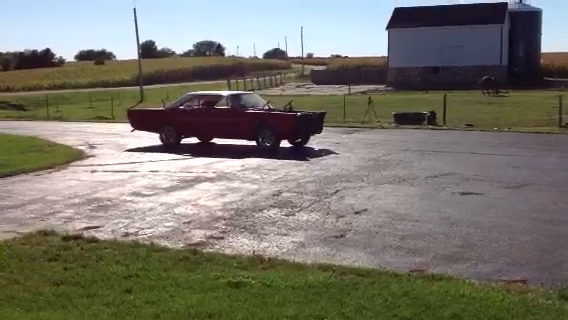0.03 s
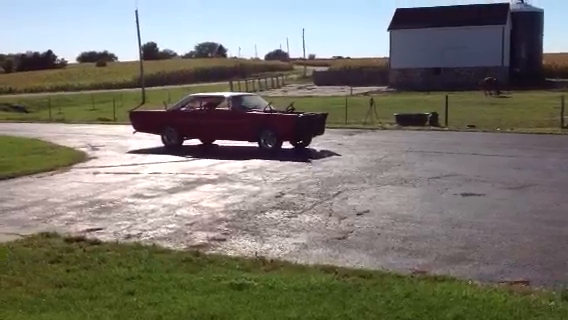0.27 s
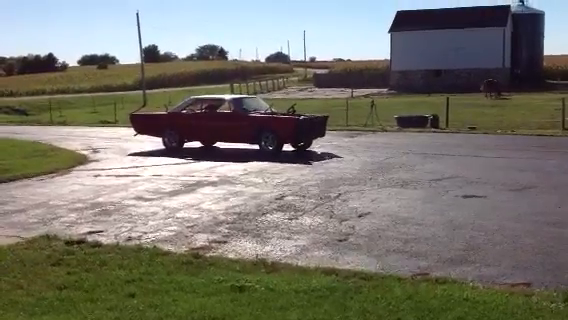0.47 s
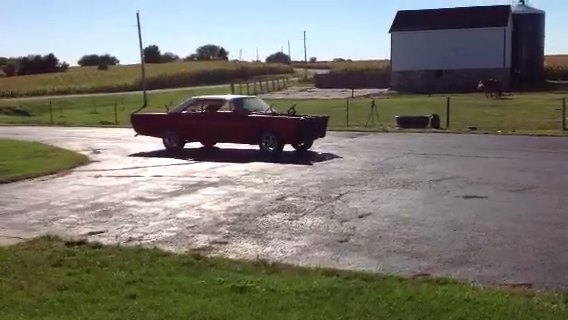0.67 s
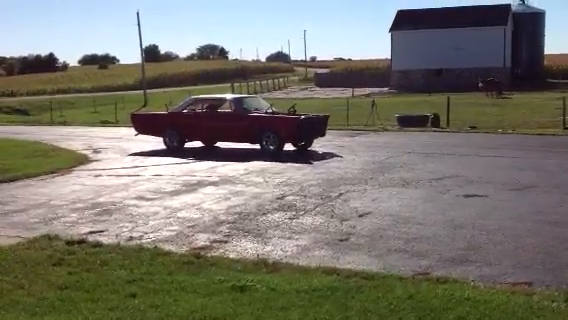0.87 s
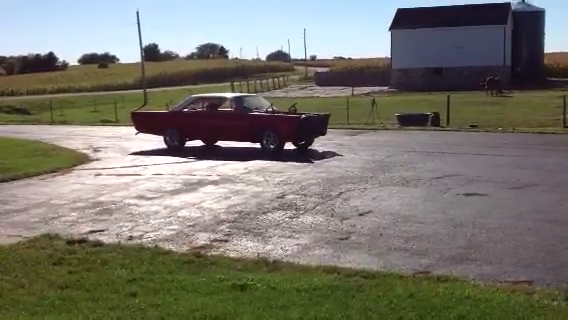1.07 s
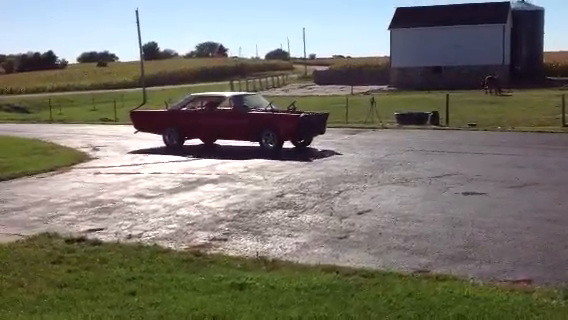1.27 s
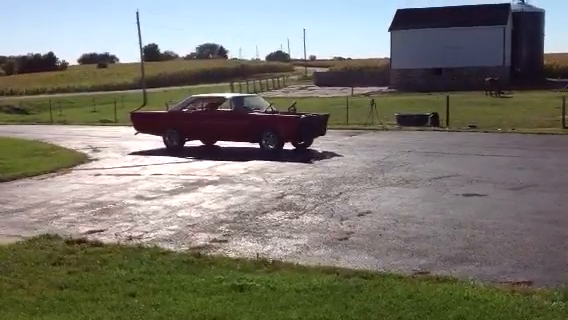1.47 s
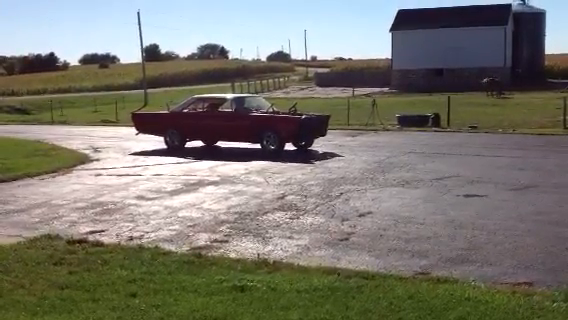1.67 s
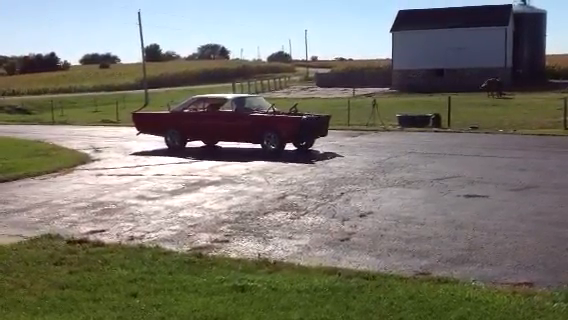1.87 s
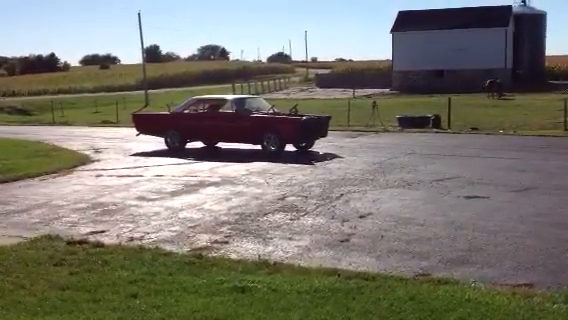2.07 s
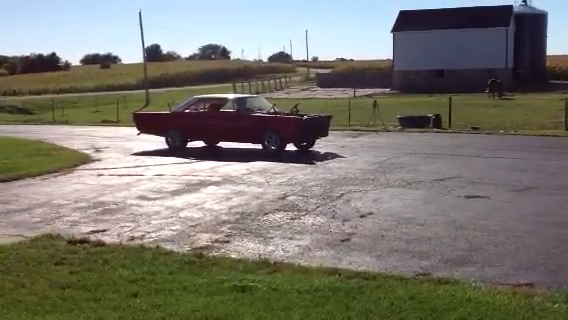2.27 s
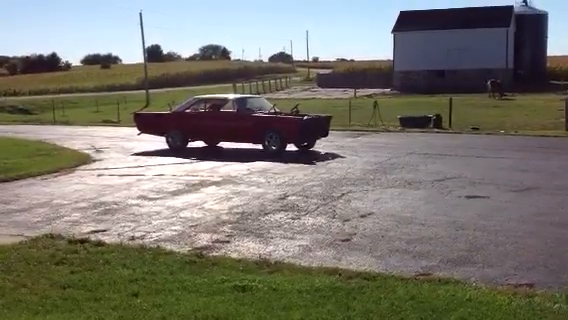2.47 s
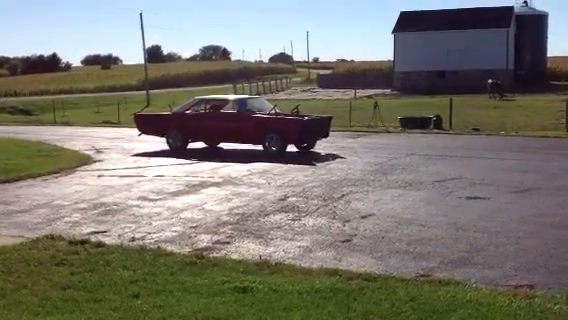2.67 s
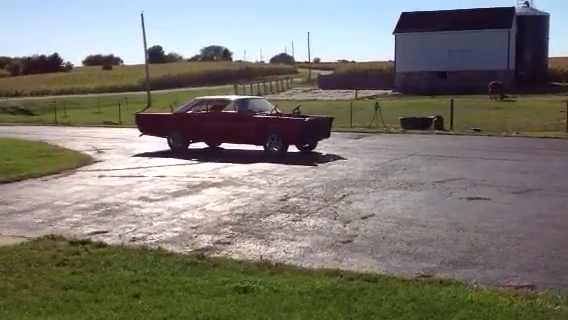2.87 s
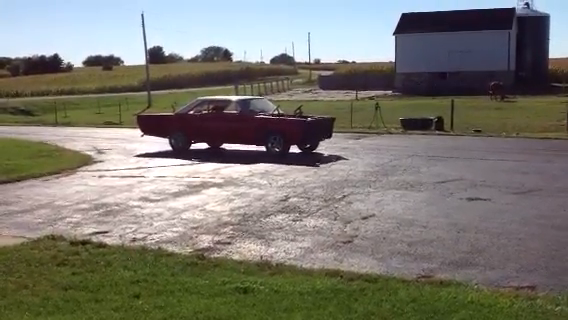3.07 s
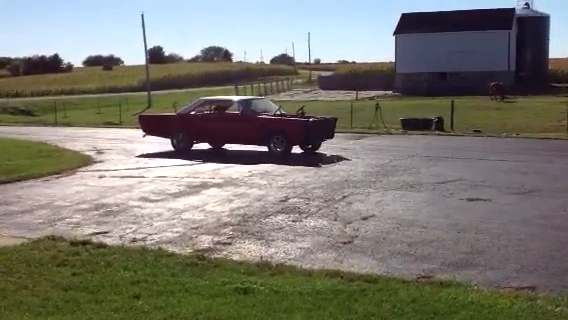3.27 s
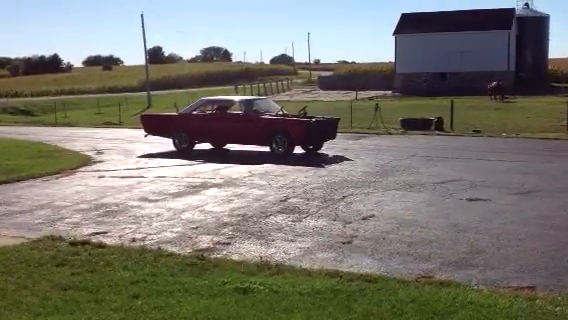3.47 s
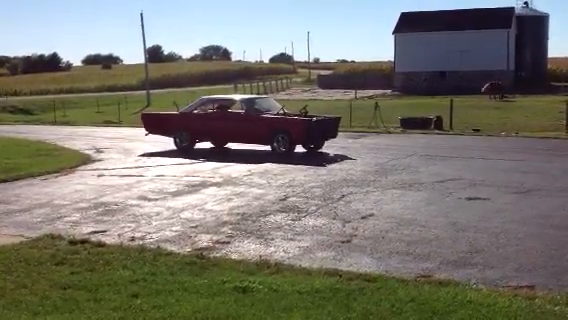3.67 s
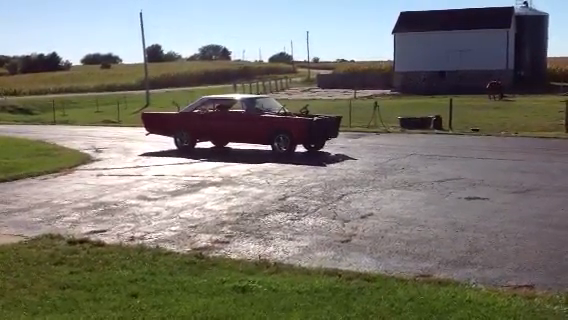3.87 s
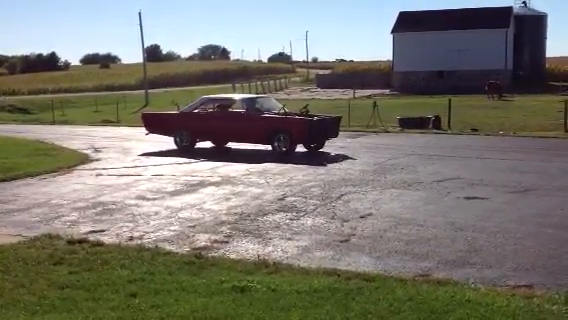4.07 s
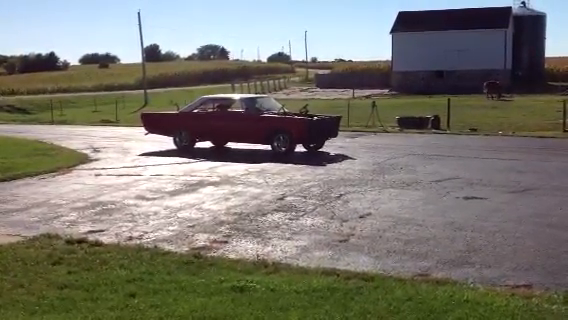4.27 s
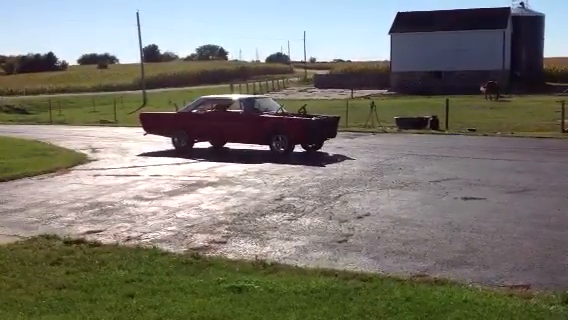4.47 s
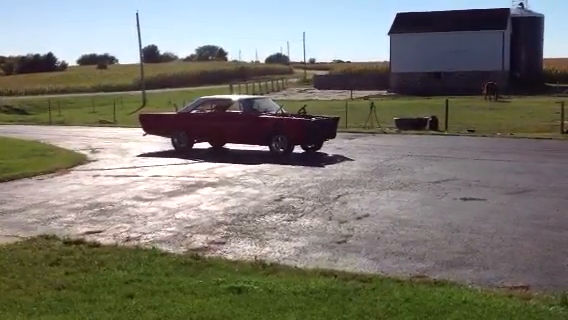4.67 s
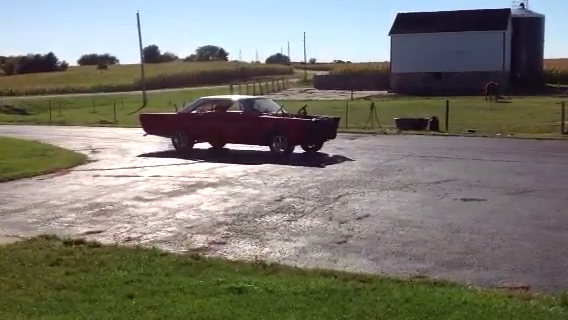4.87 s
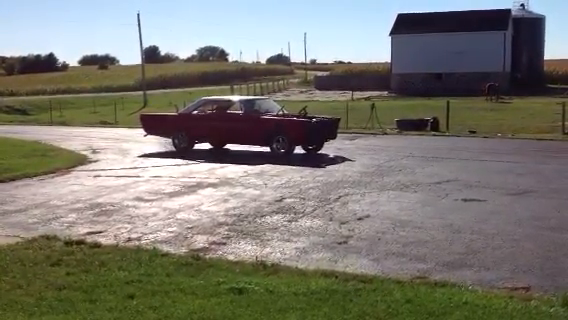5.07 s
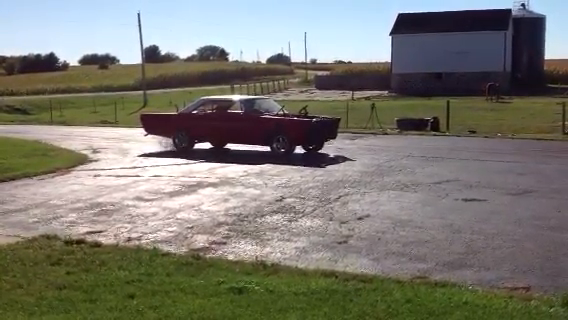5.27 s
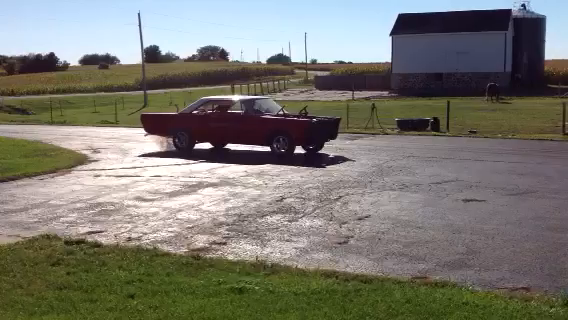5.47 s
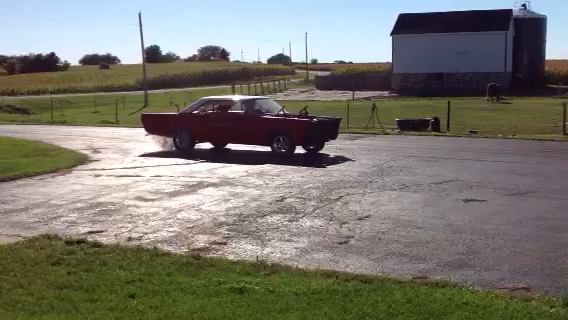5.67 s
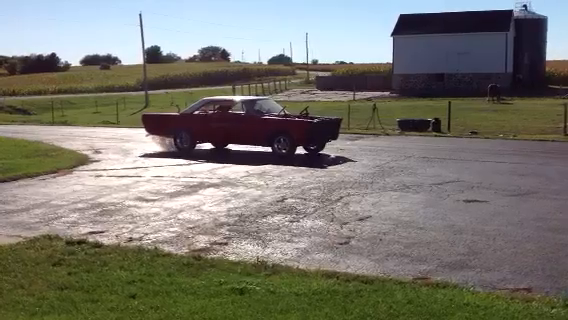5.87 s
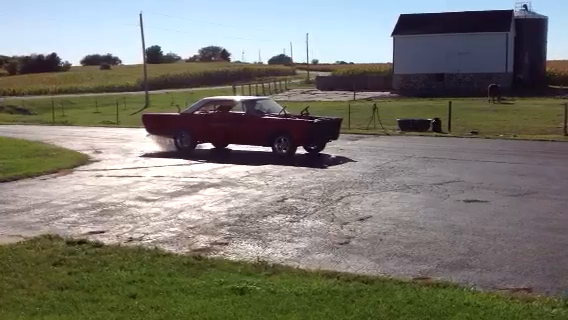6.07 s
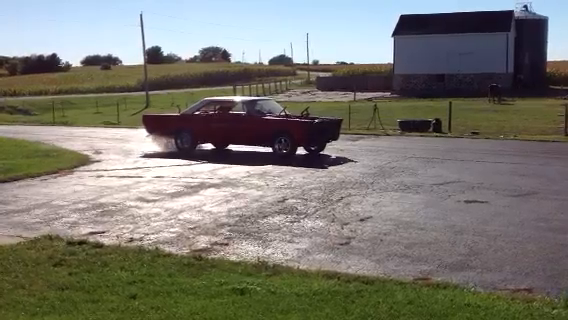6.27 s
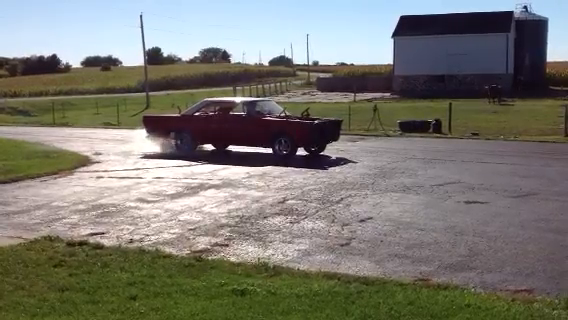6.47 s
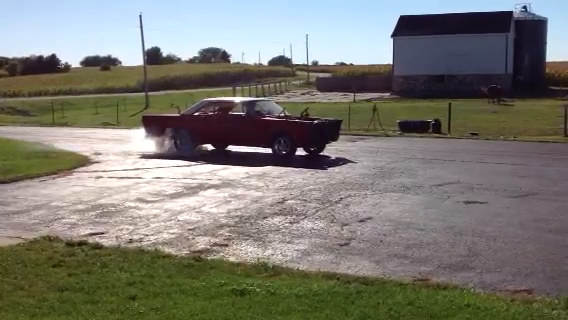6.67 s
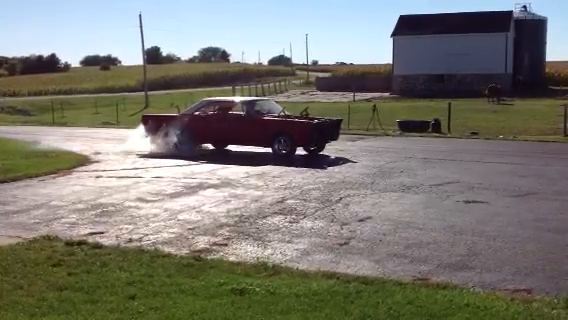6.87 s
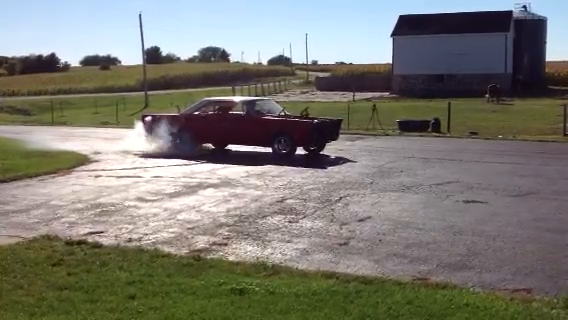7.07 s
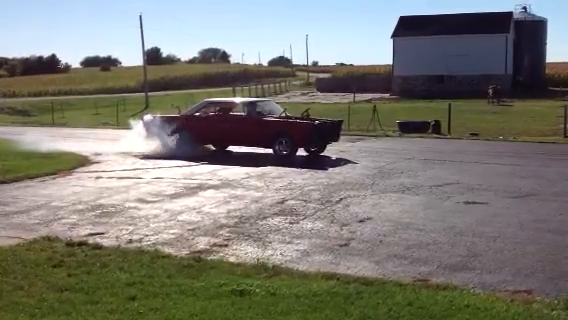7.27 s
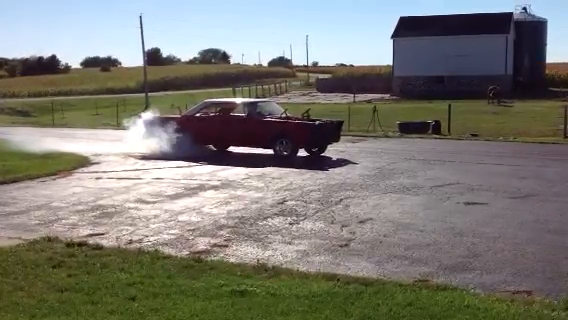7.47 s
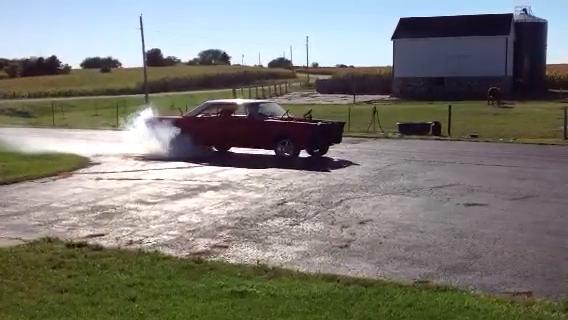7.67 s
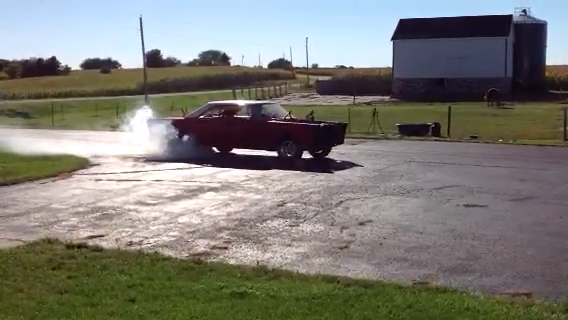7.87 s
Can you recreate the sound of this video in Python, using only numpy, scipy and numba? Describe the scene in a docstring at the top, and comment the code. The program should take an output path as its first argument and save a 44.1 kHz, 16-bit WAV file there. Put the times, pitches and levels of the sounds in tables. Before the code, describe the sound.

Open-air mono phone pickup with faint outdoor hiss and slight yard echoes. A distant lumpy V8 chugs with thin panel hum, dips low, then blips and climbs into barking, crackling exhaust. Just before four seconds the rear tyres chirp and shriek in rapid broken pieces; after five the squeal gives way to a noisy scrubbing howl rising with the engine.

```python
"""A cross-plane V8 idles on a farm driveway; its revs sag, a dry tick snaps, then it is revved on the brakes.
Uneven pulse trains ring pipe modes: one bank barks and cracks near by, the other thuds from the far side.
The rear tyres squeal in short grabs (wavering sines), whistle and scrub (filtered noise),
then smear into a rising howl of narrow-band noise. A phone listens from the grass."""
import sys
import numpy as np
from scipy import signal
from scipy.io import wavfile
from scipy.ndimage import uniform_filter1d
from numba import njit

SR = 44100
rng = np.random.default_rng(int(sys.argv[2]) if len(sys.argv) > 2 else 0)


def put_to_file(sound):
    """Save the sound as 16-bit audio at rate SR, in the file named by the first command-line argument."""
    columns = np.atleast_2d(sound).T  # one column per channel
    safe = np.clip(columns, -1, 1)
    whole_steps = np.round(safe * 32767)
    wavfile.write(sys.argv[1], SR, whole_steps.astype(np.int16))


N = 349713
T = np.arange(N) / SR


def undb(db):
    """Decibels to amplitude."""
    return 10 ** (np.asarray(db) / 20)


def level(x, db=0):
    """Scales to an rms level."""
    return x * undb(db) / np.sqrt(np.mean(x ** 2))


def even(x):
    """Holds the running rms near 1 over a third of a second."""
    return x / np.sqrt(uniform_filter1d(x ** 2, SR // 3))


def curves(table):
    """Columns of a table as sample-rate curves."""
    s, *columns = np.transpose(table)
    return [np.interp(T, s, c) for c in columns]


def shape(start, attack, hold, release):
    """Squared-ramp attack, hold, release in seconds; gain 0 to 1."""
    return np.interp(T, np.cumsum([start, attack, hold, release]), [0, 1, 1, 0]) ** 2


def noise():
    """White noise, rms 1."""
    return rng.standard_normal(N)


def walk(rate_hz):
    """Random levels joined by straight slews of 1 / rate_hz s; spread about 0.7."""
    k = int(SR / rate_hz)
    return 0.888 * uniform_filter1d(np.repeat(rng.standard_normal(N // k + 1), k), k)[:N]


def fade(x, ms):
    """Gives every pulse an exponential tail."""
    return signal.lfilter([1], [1, -np.exp(-1000 / (ms * SR))], x)


def train(at, size):
    """Single-sample pulses of the given sizes."""
    pulses = np.zeros(N)
    pulses[at] = size
    return pulses


def ring(x, modes, flip=-1):
    """Parallel resonances; alternate signs keep the valleys shallow, equal signs (flip=1) give a sharp front."""
    total = 0
    for k, (hz, width_hz, db) in enumerate(modes):
        b, a = signal.iirpeak(hz, hz / width_hz, SR)
        total = total + flip ** k * undb(db) * signal.lfilter(b, a, x)
    return total


@njit
def svf(x, hz, width_hz):
    """State-variable band-pass with a moving centre, gain 1 there."""
    y, b, l = np.empty(len(x)), 0., 0.
    for i in range(len(x)):
        g, k = np.tan(np.pi * hz[i] / SR), width_hz / hz[i]
        v = (b + g * (x[i] - l)) / (1 + g * (g + k))
        b, l, y[i] = 2 * v - b, l + 2 * g * v, k * v
    return y


# open-air noise bands: (centre [Hz], width [Hz], gain [dB])
AIR_BANDS = [(45, 40, -24), (181, 143, 29.5), (930, 1900, 15.5), (4230, 9200, 4.5), (11500, 6700, -2)]


def air():
    """Steady background: white noise through broad resonances."""
    return level(ring(noise(), AIR_BANDS), -44.0)


def yard(car):
    """The barn and the yard send back two delayed, low-passed echoes."""
    dull = signal.lfilter([.3], [1, -.7], car)
    return sum(undb(db) * np.interp(T - s, T, dull, left=0) for s, db in ((.047, -21), (.093, -14)))


# a dry tick close by and its rebound: (time [s], level [dB])
TICK_HITS = [(1.169, -13), (1.173, -28)]


def ticks():
    """Bright snaps: noise under a 1 ms decay with a faint 8 ms tail."""
    hits = np.zeros(N)
    for s, db in TICK_HITS:
        hits[int(s * SR)] = undb(db)
    burst = (fade(hits, 0.98) + 0.12 * fade(hits, 7.9)) * noise()
    return ring(burst, [(6200, 13000, -8.0), (12000, 7000, 3.0)])


# panels humming at low revs: (pitch [Hz], rms level [dB], start [s], attack [s], hold [s], release [s])
PANEL_DRONES = [(276.4, -45.5, -0.38, .1, 0.9, 0.2), (189, -44, 0.775, 0.087, 0.26, .05),
                (188.5, -45.5, 1.37, 0.31, 0.21, .15)]


def drones():
    """Panels drone as thin sines, slightly wavering in pitch and level."""
    total = 0
    for hz, db, *when in PANEL_DRONES:
        size = np.sqrt(2) * undb(db + 2 * walk(9.7)) * shape(*when)
        phase = 2 * np.pi * np.cumsum(hz * (1 + 0.0092 * walk(11.7))) / SR
        total = total + size * np.sin(phase)
    return total


# pitch at which the tread sings, first squeal, then howl: (time [s], pitch [Hz])
TREAD_PITCH = [(3.1, 1262), (3.4, 1248), (3.83, 1156), (3.88, 1070), (3.94, 1004), (4.09, 1040),
               (4.23, 998.6), (5.18, 980), (5.3, 1003), (6.0, 1012), (6.25, 1072), (6.45, 1190),
               (6.62, 1198), (6.9, 1354), (7.15, 1407), (7.4, 1470), (7.93, 1560)]


def tread_hz():
    """Stick-slip pitch shared by squeal and howl."""
    return curves(TREAD_PITCH)[0]


def slip_band(hz, width_hz, octave_gain):
    """Narrow noise band with a faint octave; self-excited, so its size is steadier than noise."""
    band = svf(svf(noise(), hz, width_hz), hz, 3 * width_hz)
    envelope = np.abs(signal.hilbert(band)).clip(.02 * band.std())
    band = level(band / envelope ** .6)
    return band + octave_gain * level(svf(noise(), 2 * hz, 2 * width_hz))


# envelopes: start, attack, hold, release [s]
WHISTLE_S, WHISTLE_DB = (3.86, 0.061, 0.99, 0.17), -24.5
WHISTLE_PEAK_S, WHISTLE_PEAK_DB = (3.99, 0.041, 0.1, 0.035), -21  # brief swell
WHISTLE_FROM_HZ, WHISTLE_TO_HZ, WHISTLE_SETTLES_S = 2130., 1487, 0.57


def whistle():
    """Narrow noise band whose pitch falls exponentially; returns pitch and sound."""
    settle = np.exp(-(T - WHISTLE_S[0]).clip(0) / WHISTLE_SETTLES_S)
    hz = WHISTLE_TO_HZ + (WHISTLE_FROM_HZ - WHISTLE_TO_HZ) * settle
    size = undb(WHISTLE_DB + 0.93 * walk(14)) * shape(*WHISTLE_S)
    size = size + undb(WHISTLE_PEAK_DB) * shape(*WHISTLE_PEAK_S)
    return hz, size * slip_band(hz, 45., .05)


HOWL_S, HOWL_DB = (5.1, .2, 2.05, .12), -24  # faint at first
HOWL_LOUD_S, HOWL_LOUD_DB = (6.05, .25, 1.08, .09), -23  # added as the wheels gather speed


def howl():
    """Wider noise band on the tread's rising pitch."""
    size = undb(HOWL_DB) * shape(*HOWL_S) + undb(HOWL_LOUD_DB) * shape(*HOWL_LOUD_S)
    return size * slip_band(tread_hz(), 60., .2)


SUM_TONE_GAIN_DB = 14


def sum_tone(sing, whistle_hz, whistling):
    """Squeal and whistle multiply in the same rubber; the sum frequency is kept."""
    product = sing * even(whistling + 1e-6 * noise()) * whistling.std()
    tone = svf(product, whistle_hz + tread_hz(), 250.)
    return undb(SUM_TONE_GAIN_DB) * tone * shape(*WHISTLE_S)


# tyre-on-asphalt resonances: (centre [Hz], width [Hz], gain [dB])
SCRUB_MODES = [(765, 610, -0.5), (727, 70, -1), (1038, 470, -1.5), (1364, 870, 4.3), (1942, 360, 2),
               (2520, 720, -1), (4440, 7600, -12), (9260, 2800, -18)]
SCRUB_S, SCRUB_DB = (3.8, 0.13, 5., .1), -15.76  # level once grown
SCRUB_GROWS_DB, SCRUB_GROWS_S = 5.5, 1.74


def scrub():
    """Broad slip noise: flickering grit through the scrub resonances, once and twice."""
    grit = noise() * undb(2.2 * walk(70) + .6 * walk(9))
    once = ring(grit, SCRUB_MODES)
    twice = ring(once, SCRUB_MODES, flip=0.89)
    missing_db = SCRUB_GROWS_DB * (1 - (T - SCRUB_S[0]) / SCRUB_GROWS_S).clip(0, 1)
    return level(twice + 0.89 * once) * undb(SCRUB_DB - missing_db) * shape(*SCRUB_S)


# tread grips and sings: (start [s], level [dB], length [ms])
TREAD_GRABS = [(3.112, -26, 120), (3.268, -31, 31), (3.842, -15.5, 45), (3.893, -19.5, 36), (3.93, -10, 70),
               (3.954, -11.5, 54), (4.012, -20, 47), (4.056, -10.5, 42), (4.136, -9.5, 49), (4.192, -6, 84),
               (4.277, -6, 175), (4.452, -8, 33), (4.495, -6, 20), (4.525, -5.5, 18), (4.551, -6.5, 124),
               (4.689, -6, 55), (4.754, -9, 56), (4.841, -5, 38), (4.914, -4, 59), (4.989, -6.5, 76),
               (5.09, -6, 23), (5.122, -7.5, 38), (5.274, -13.5, 31), (5.392, -14, 35), (5.465, -11.5, 39)]
# overtones of the squeal: (multiple, level at full size [dB])
SQUEAL_OVERTONES = [(2, -11.5), (3, -27)]
GRAB_EDGE_S = .0082  # rise and fall
SINGS_S, SINGS_DB = (3.9, 0.092, 1.27, 0.095), -30  # tread keeps singing between grabs
OVERTONES_S = (2.97, 0.054, 1.73, 0.72)  # overtones thin out as the squeal tires
THIN_S, THIN_SHARE = (3.7, .03, .4, 0.1), 0.8  # overtones held back as the squeal sets in
RASP_HZ, RASP_WIDTH_HZ, RASP_DB = 2690, 400, -32.5  # rough edge


def squeal():
    """Stick-slip of the tread: a wavering tone with smeared overtones and a rough halo."""
    hz = tread_hz() * (1 + 0.01178 * walk(90) + .008 * walk(25))
    phase = 2 * np.pi * np.cumsum(hz) / SR
    size = 1e-6 + undb(SINGS_DB) * shape(*SINGS_S)
    for s, db, ms in TREAD_GRABS:
        hold_s = max(ms / 1000 - GRAB_EDGE_S, 0)
        size = size + undb(db) * shape(s - GRAB_EDGE_S / 2, GRAB_EDGE_S, hold_s, GRAB_EDGE_S)
    size = size * undb(2.0 * walk(120) + 1.0 * walk(35))
    tone = np.sin(phase) * (1 + 0.028 * walk(320))
    body = size ** 0.076 * (1 - THIN_SHARE * shape(*THIN_S)) * shape(*OVERTONES_S)
    for multiple, db in SQUEAL_OVERTONES:
        overtone = np.sin(multiple * (phase + .3 * walk(160)))
        tone = tone + body * undb(db + 4 * walk(25) + 2 * walk(80)) * overtone
    rasp = level(ring(noise(), [(RASP_HZ, RASP_WIDTH_HZ, 0)]), RASP_DB) * undb(2.6 * walk(40))
    return size * tone + size ** 0.51 * (size > 1e-4) * rasp


def tyres():
    """Squeal, whistle, howl, their sum tone and scrubbing of the slipping rubber."""
    sing = squeal()
    whistle_hz, whistling = whistle()
    return sing + whistling + howl() + sum_tone(sing, whistle_hz, whistling) + scrub()


# crank speed: (time [s], speed [rpm])
CRANK_SPEED = [(0.0, 903), (0.85, 898), (1.1, 709), (1.35, 650), (2.05, 755), (2.25, 988), (2.65, 866),
               (2.95, 1205), (3.2, 1261), (3.6, 1212), (3.9, 1415), (4.62, 1772), (5.3, 1912), (5.6, 1912),
               (6.27, 2059), (7.27, 2466), (7.6, 2751), (7.93, 3119)]


def crank():
    """Crank speed in rpm, and the push (0.3 up) that grows with it."""
    rpm = curves(CRANK_SPEED)[0]
    return rpm, ((rpm - 450) / 1200).clip(.3, 1)


# cylinders in firing order: (pipe lag [ms], thud at low, middle, high revs [dB x3], bark [dB],
# bark change per doubling of high revs [dB], crack [dB], crack change per doubling [dB])
FIRING_ORDER = [(0, 0, 0, -5, 0, -3, -7, -2), (3.55, 0, -21, 2, -8, -3, -22, 0),
                (-.73, -2, 1, -4, -6, 5, -1, 0), (-.7, -7, -9, -10, -10, -3, 0, -11),
                (5.3, -7, -15, -1, -13, 4, -22, 0), (-1.2, 2, -8, 2, -10, 13, -1, 3),
                (3.4, -3, -18, -24, -13, 4, -22, 0), (-1.14, -4, -7, -30, -11, 4, -22, 0)]
FIRST_FIRING = .55  # place in the cycle, eighths


def firings(rpm):
    """Eight firings every two turns, each with its own pipe lag, jitter and strengths."""
    eighths = np.cumsum(rpm / 60 * 4 / SR) - FIRST_FIRING + 1
    fired = np.flatnonzero(np.diff(np.floor(eighths)))
    lag_ms, *strengths = np.array(FIRING_ORDER)[np.arange(len(fired)) % 8].T
    chance = rng.standard_normal((len(fired), 4)).T
    delay = (.0001 * SR * chance[0] + lag_ms * SR / 1000).astype(int)
    heard = np.clip(fired + delay, 0, N - 1)
    return fired, heard, strengths, chance


# low, middle and high revs: [rpm]
THUD_REVS_RPM = [1300, 1920, 2880]
# exhaust pipe resonances: (centre [Hz], width [Hz], gain [dB])
PIPE_MODES = [(104, 49, -10), (136.3, 15.7, -1), (195.9, 43.6, 6), (229.8, 63, 5), (283.5, 33, 4.5),
              (349, 60, 0.5), (417, 140, -6.5)]
# silencer boom at low revs: (centre [Hz], width [Hz], gain [dB])
BOOM_MODES = [(116, 59, 23)]
THUD_SCATTER_DB, PIPE_WANDER_DB = .7, 2


def thuds(at, revs, thud_db, chance, push):
    """Pressure pulses ring the pipe; each resonance wanders as the gas flow changes."""
    db = sum(col * np.interp(revs, THUD_REVS_RPM, share) for col, share in zip(thud_db, np.eye(3)))
    pulses = train(at, undb(db + .7 * chance[1] + THUD_SCATTER_DB * chance[3]))
    low = 0
    for k, mode in enumerate(PIPE_MODES):
        low = low + (-1) ** k * undb(PIPE_WANDER_DB * walk(5)) * ring(pulses, [mode])
    low = even(low) + level(ring(noise(), PIPE_MODES), -14)
    return even(low + (.95 - push).clip(0) * ring(low, BOOM_MODES))


# bark resonances: (centre [Hz], width [Hz], gain [dB])
BARK_MODES = [(567, 210, 2), (610, 180, 5.5), (725, 89, 6), (1100, 290, -7.5), (1384, 110, -2.5),
              (1988, 130, -10.5)]
# bare pressure front: (centre [Hz], width [Hz], gain [dB])
POP_MODES = [(1000, 1300, 0)]
# narrow rings of the lumpy low-rev chug: (centre [Hz], width [Hz], gain [dB])
CHUG_MODES = [(612, 17, 26.5), (740, 30, 13.5), (1350, 32, -20)]
IDLE_LOPE = .4  # least share of the cylinders' bark differences
RASP_SHARE_DB, POP_DB, POP_CONTRAST, CHUG_GAIN_DB = 0.5, 4, 1.65, 7.52


def barks(at, bark_db, shifted_db, contrast, chance, push):
    """Rounded fronts ring twice, with rasping gas, bare pops under load and a chug at low revs."""
    kick = train(at, undb(contrast.clip(IDLE_LOPE) * shifted_db + 3 * chance[2]))
    kick = signal.sosfilt(signal.butter(3, 1550, fs=SR, output="sos"), kick)
    rasp = even(ring((push.clip(.6) * even(fade(kick, 3.5)) + .22) * noise(), BARK_MODES))
    knock = even(ring(ring(kick, BARK_MODES, flip=1), BARK_MODES, flip=1))
    # expanded differences: strong cylinders dominate
    front = train(at, undb(POP_CONTRAST * shifted_db + 1.2 * chance[2]))
    front = signal.sosfilt(signal.butter(5, (200, 1520), "band", fs=SR, output="sos"), front)
    pop = (push - 0.35).clip(0) * (1.7 - push) * even(ring(front, POP_MODES))
    chug = even(ring(train(at, undb(1.8 * bark_db + 2 * chance[2])), CHUG_MODES))
    chug = (.8 - push).clip(0) * chug
    return undb(RASP_SHARE_DB) * rasp - 0.93 * knock - undb(POP_DB) * pop + undb(CHUG_GAIN_DB) * chug


# hot-gas crack resonances: (centre [Hz], width [Hz], gain [dB])
CRACK_MODES = [(4250, 690, 0.5), (5120, 550, 2.5), (5830, 620, 4.5), (6650, 740, 4.5), (7530, 1300, 2.5),
               (11100, 5500, -6)]
# fan and intake hiss: (centre [Hz], width [Hz], gain [dB])
HISS_MODES = [(1780, 2950, -2.5), (3470, 4160, 0.5), (5800, 4850, -4.5), (11900, 5600, -15.5)]
THROTTLE_OPENS_S, THROTTLE_TAKES_S = 1.97, 0.15
CRACK_SHUT_DB, CRACK_OPEN_DB = -10.5, -12  # crack and hiss, against the exhaust level at 1500 rpm
CRACK_DB_PER_OCTAVE, CRACK_SHARE_SHUT = 0.5, 0.33  # share of crack left with the throttle shut


def cracks(at, revs, crack_db, slope_db, chance, rpm):
    """Hot-gas jets: noise puffs peaking just after the pressure front, over fan and intake hiss."""
    db = crack_db + slope_db * np.log2(revs / 1250).clip(0) + 2. * chance[3]
    puff = fade(fade(train(at, undb(db)), .6), 1.5)
    jet = even(ring(ring((even(puff) + 0.34) * noise(), CRACK_MODES), CRACK_MODES))
    throttle = ((T - THROTTLE_OPENS_S) / THROTTLE_TAKES_S).clip(0, 1)
    gas = throttle.clip(CRACK_SHARE_SHUT) * jet + level(ring(noise(), HISS_MODES), -0.051)
    gas_db = CRACK_SHUT_DB + (CRACK_OPEN_DB - CRACK_SHUT_DB) * throttle
    return gas * undb(gas_db + CRACK_DB_PER_OCTAVE * np.log2(rpm / 1500))


# exhaust level: (time [s], level [dB])
EXHAUST_LEVEL = [(0, -41.5), (.95, -42.5), (1.1, -49.5), (1.6, -48.5), (2, -43.5), (2.25, -35), (2.7, -36),
                 (2.9, -28.5), (3.1, -30.5), (3.35, -29), (3.6, -29.5), (3.85, -26), (4.15, -22.5),
                 (4.45, -22.5), (5, -21.5), (6.1, -20), (7.2, -21), (7.93, -17.5)]
THUD_DB, BARK_DB = 0.5, -1  # against the exhaust level


def engine():
    """Each firing thuds in its pipe, barks, and cracks with hot gas."""
    rpm, push = crank()
    fired, at, strengths, chance = firings(rpm)
    *thud_db, bark_db, bark_slope_db, crack_db, crack_slope_db = strengths
    revs = rpm[fired]
    shifted_db = bark_db + bark_slope_db * np.log2(revs / 1700).clip(0)
    low = level(thuds(at, revs, thud_db, chance, push), THUD_DB)
    bark = level(barks(at, bark_db, shifted_db, push[fired], chance, push), BARK_DB)
    crack = cracks(at, revs, crack_db, crack_slope_db, chance, rpm)
    return undb(curves(EXHAUST_LEVEL)[0]) * (low + bark + crack)


# bands cancelled by the ground reflection: (centre [Hz], width [Hz], cancelled share [dB])
GROUND_BANDS = [(1760, 73, -4), (2324, 440, -16.5)]


def ground(car):
    """The asphalt mirrors the car and cancels narrow bands."""
    return car - ring(car, GROUND_BANDS, flip=1)


def scene():
    """Car over the asphalt, with yard echoes, ticks and air; one channel."""
    car = ground(drones() + tyres() + engine())
    return (air() + yard(car) + ticks() + car)[None]


TOP_HZ = 15450


def record(dry):
    """The phone drops the deep bass, rounds the loudest peaks and cuts the top."""
    x = signal.sosfilt(signal.butter(4, 80, "high", fs=SR, output="sos"), dry)
    x = 0.7 * np.tanh((np.abs(x) / 0.97) ** 2.361) ** (1 / 2.669) * np.sign(x)
    x = signal.sosfilt(signal.butter(2, 45, "high", fs=SR, output="sos"), x)
    return signal.sosfilt(signal.ellip(10, .2, 70, TOP_HZ, fs=SR, output="sos"), x)


dry = scene()
out = record(dry)
put_to_file(out)
```